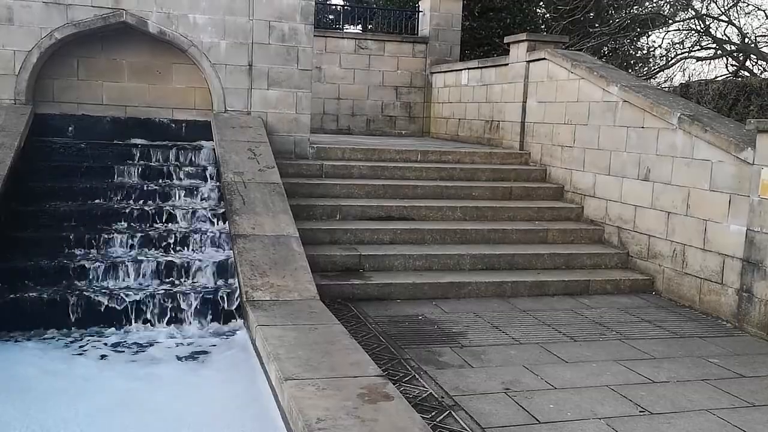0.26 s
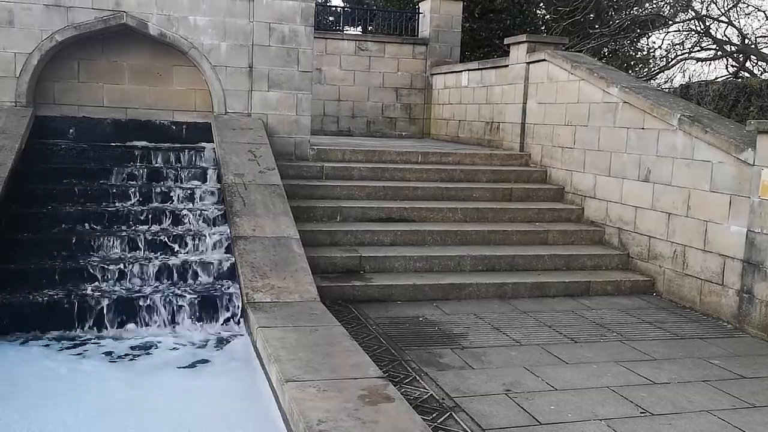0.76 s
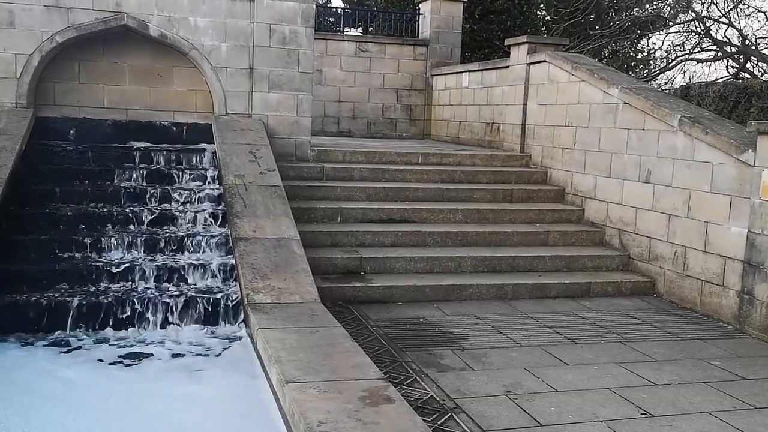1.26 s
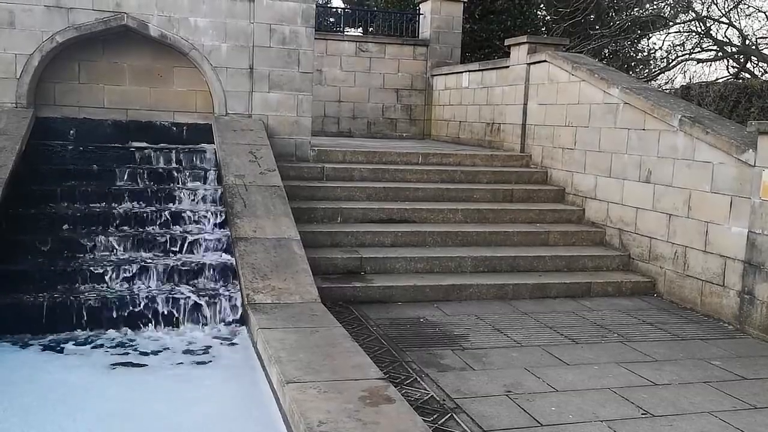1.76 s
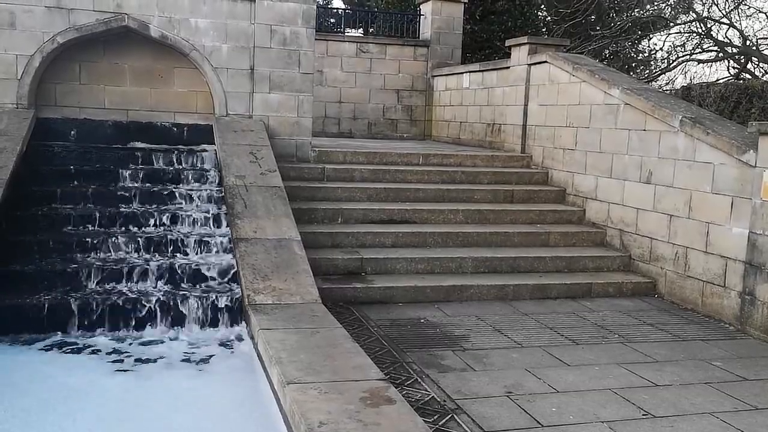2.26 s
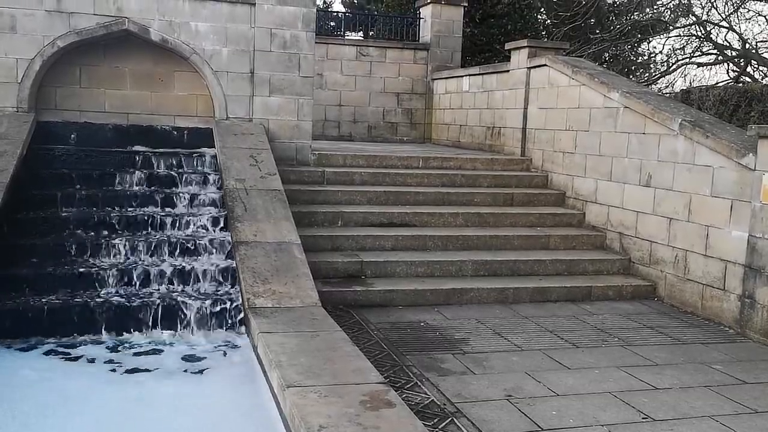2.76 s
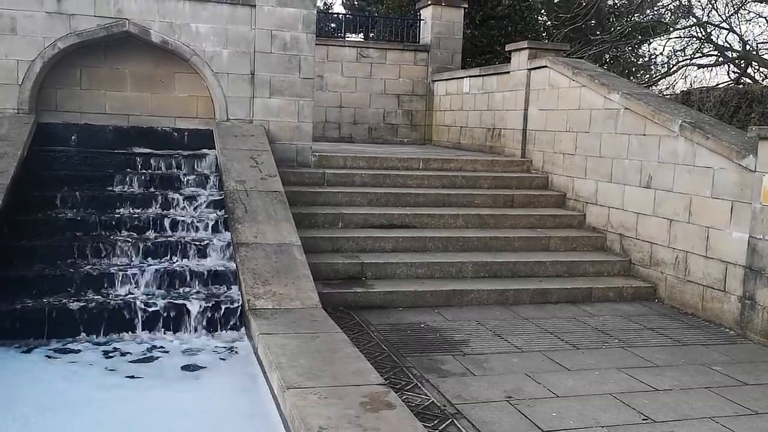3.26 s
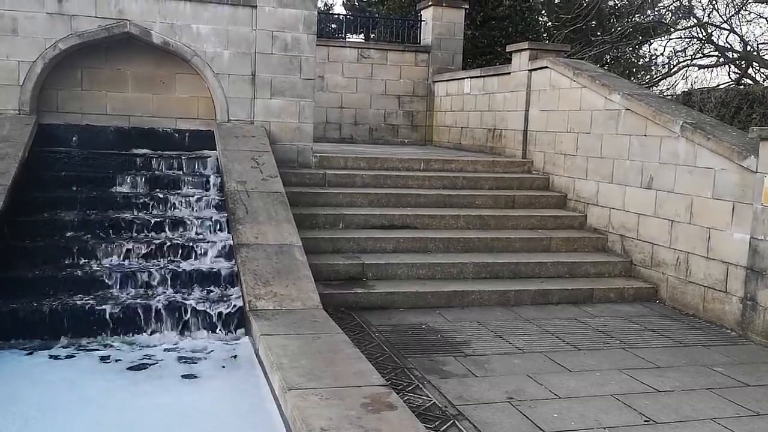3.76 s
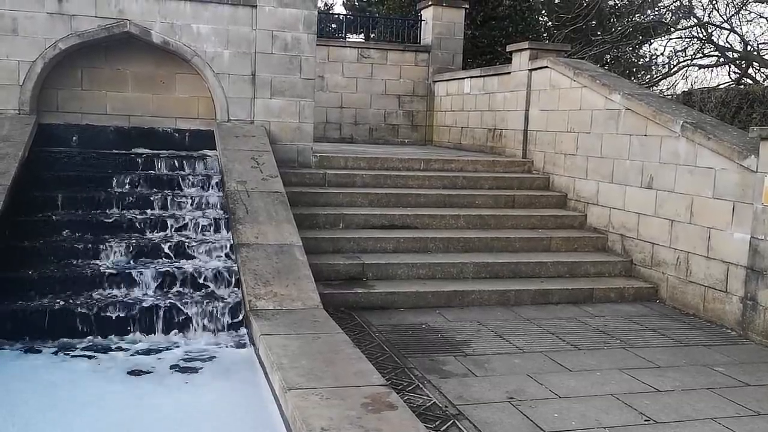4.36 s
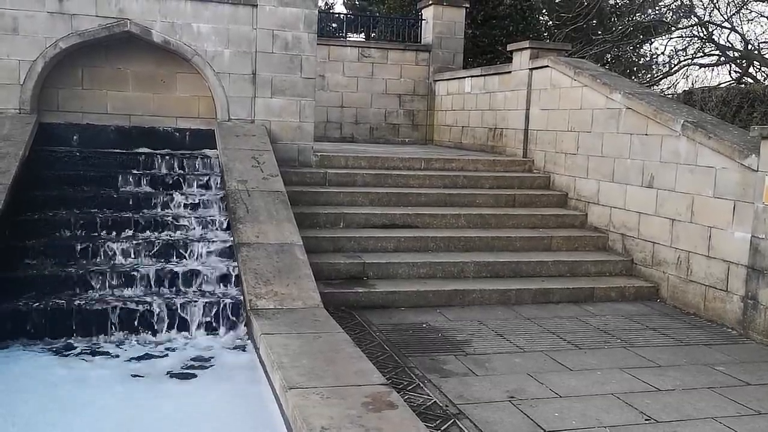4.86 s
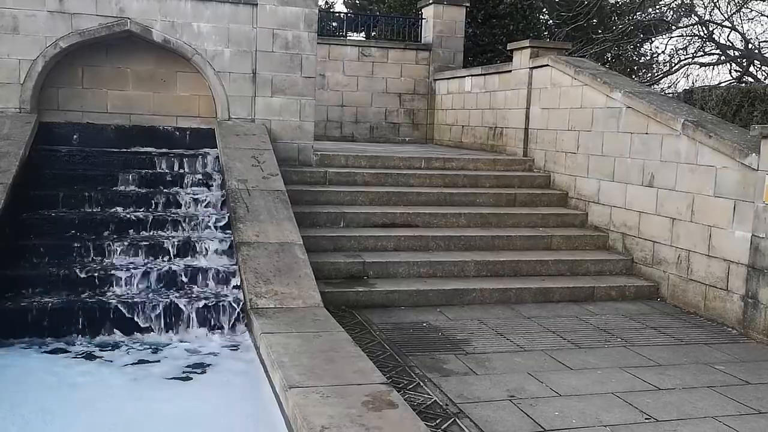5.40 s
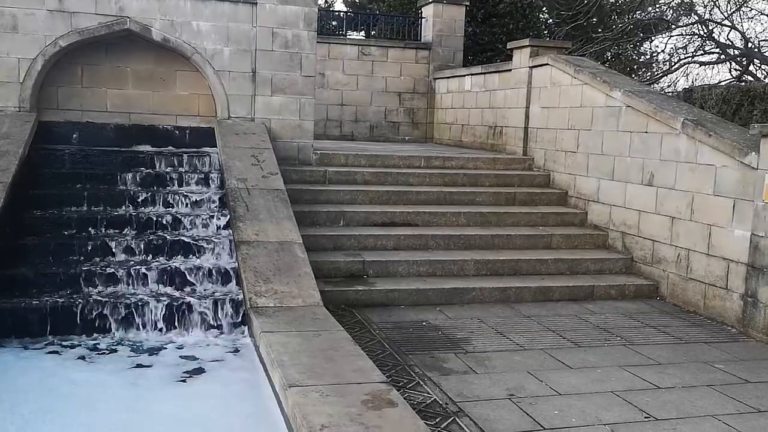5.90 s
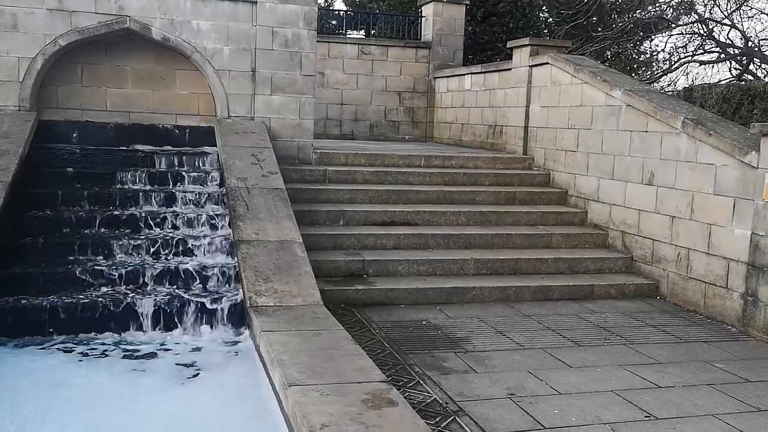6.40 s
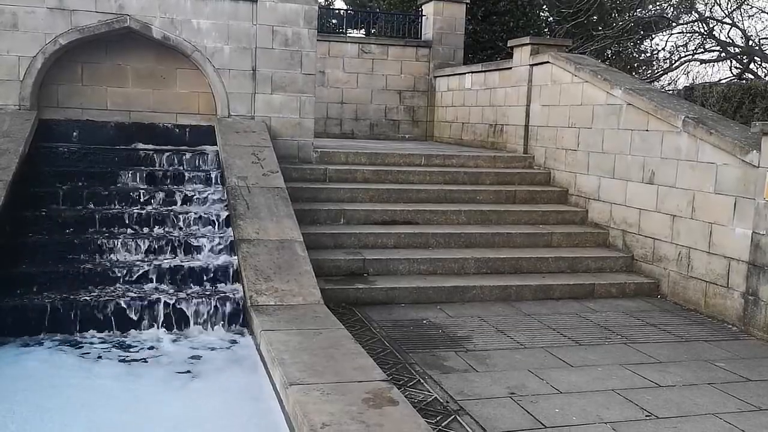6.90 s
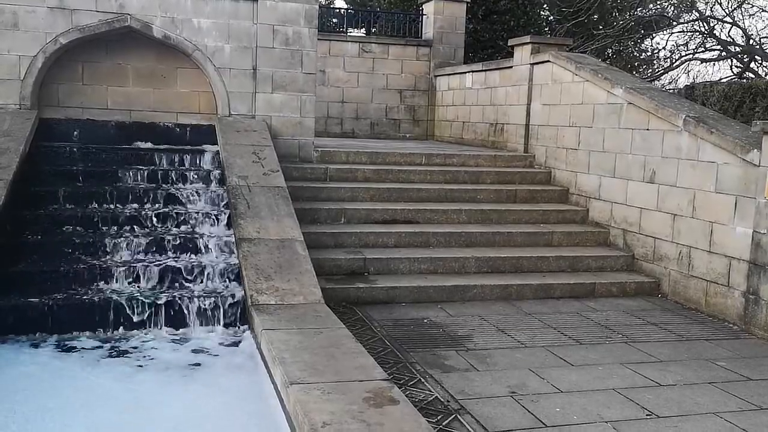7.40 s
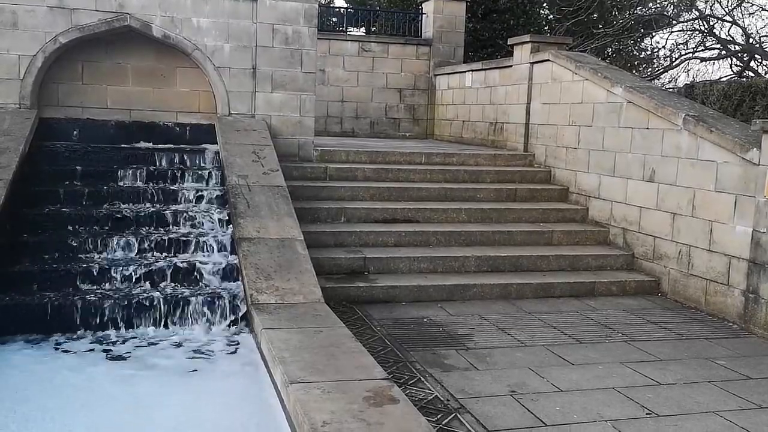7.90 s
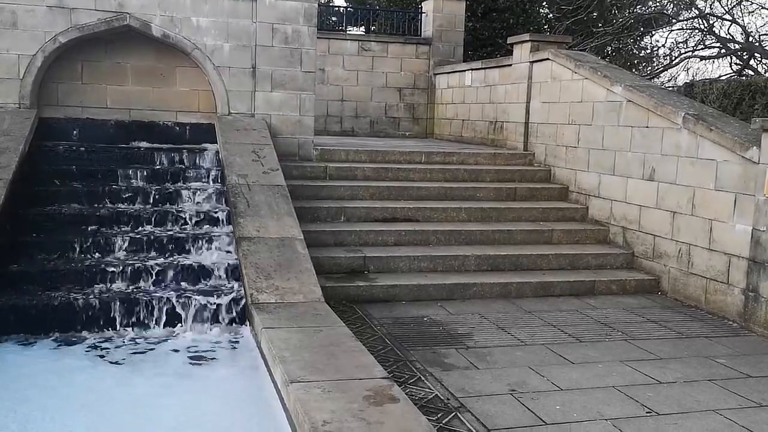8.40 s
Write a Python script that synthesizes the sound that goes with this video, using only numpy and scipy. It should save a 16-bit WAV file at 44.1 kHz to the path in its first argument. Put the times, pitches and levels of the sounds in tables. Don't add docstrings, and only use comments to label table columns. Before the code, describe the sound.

Thin water splashes steadily down stone steps into a foamy pool, over low distant traffic rumble and three dull, far-off machine thuds.

```python
import sys
import numpy as np
from scipy import signal
from scipy.fft import rfft, irfft
from scipy.io import wavfile
from scipy.ndimage import uniform_filter1d

SR = 44100
rng = np.random.default_rng(int(sys.argv[2]) if len(sys.argv) > 2 else 0)


def boost(x):
    u = np.asarray(x, float) / 20
    return 10 ** u


def store_wav(level_fs):
    pcm = np.round(np.clip(np.atleast_2d(level_fs), -1, 1) * 32767)
    wavfile.write(sys.argv[1], SR, pcm.T.astype(np.int16))


N = 381465

# pitch_hz, density_db (per Hz)
ROAD_ROAR = [(41, -15), (70, -3.5), (135, -8), (161, -8.5), (194, -8), (242, -9), (295, -18), (500, -25.5),
             (650, -46.5), (1100, -120)]
EDGES_HZ = 200 * 2 ** (np.arange(14) / 2)


def rms_one(x):
    return x / np.sqrt(np.mean(x ** 2) + 1e-20)


def in_time(rows):
    s, *columns = np.transpose(rows)
    return [np.interp(np.arange(N) / SR, s, c) for c in columns]


def at_hz(points):
    hz, value = np.transpose(points)
    bins_hz = np.arange(N // 2 + 1) * SR / N
    return np.interp(np.log(bins_hz + 1), np.log(hz), value)


def coloured(spectrum):
    white = rfft(rng.standard_normal(N))
    return rms_one(irfft(white * boost(at_hz(spectrum)), N))


def drift(rate):
    r = np.exp(-80 * np.pi * rate / SR)
    kicks = rng.standard_normal(N // 40 + 2002)
    slow = signal.lfilter([1], [1, -2 * r, r * r], kicks)[2000:]
    return np.interp(np.arange(N) / 40, np.arange(len(slow)), rms_one(slow))


def ring(clicks, hz, t60):
    r = boost(-60 / (t60 * SR))
    w = 2 * np.pi * hz / SR
    return signal.lfilter([0, np.sin(w)], [1, -2 * r * np.cos(w), r * r], clicks + 1e-18)


def grains(per_s, spread_db):
    sizes = boost(spread_db * np.minimum(rng.exponential(1, N), 3.5)) * rng.choice([-1, 1], N)
    return sizes * (rng.random(N) < per_s / SR)


def splash(surge_db, gains, flicker):
    bubble_cycles = 26
    white = rng.standard_normal((2, N))
    bubbles = grains(1100 * boost(2.5 * surge_db), spread_db=3.5)
    dealt = rng.integers(0, 26, N)
    crackle = rms_one(grains(5000 * boost(2.5 * surge_db), spread_db=3.0))
    out = boost(-18) * crackle
    for k, (low, high) in enumerate(zip(EDGES_HZ, EDGES_HZ[1:])):
        band = signal.butter(2, [low, high], "band", fs=SR, output="sos")
        sheet = signal.sosfilt(band, white[k % 2])
        pops = np.zeros(N)
        for j, hz in enumerate(low * np.array([1.09, 1.3])):
            pops = pops + ring(bubbles * (dealt == 2 * k + j), hz, bubble_cycles / hz)
        pops_db = -6.5 - 2.8 * (low > 4000)
        out = out + gains[k] * (rms_one(sheet) * flicker[k] + boost(pops_db) * rms_one(pops))
    return out


def water():
    # start_s, level_db
    flow = [(0, -39.5), (1.0, -39), (2.0, -39), (3.0, -39), (3.75, -39), (3.87, -39), (4.0, -39),
            (4.6, -38.5), (5.3, -39), (6.5, -39), (7.2, -39), (8.0, -39), (8.65, -39)]
    # pitch_hz, density_db (per Hz)
    left_port = [(300, -6), (600, -8), (990, -2.5), (1420, -7.5), (1850, 2), (2200, -4), (2500, 2.5),
                 (2970, -7.5), (3660, -4), (4400, -6), (5730, -14), (7540, -15), (9500, -24), (13000, -29)]
    right_port = [(300, -6), (645, -10.5), (1350, -3), (1720, 2), (2280, 1.1), (2670, 7), (4050, -15.5),
                  (6590, -18.5), (7800, -22.5), (8480, -67), (9040, -20.5), (9500, -24.5), (10470, -31),
                  (13000, -30.5)]
    # pitch_hz, alike_share (0-1)
    likeness = [(301, 0.01), (904, 0.55), (1162, 0.44), (1593, 0.16), (2282, 0.44), (2540, 0.71),
                (4134, 0.29), (4995, 0.52), (6201, 0.53), (10938, 0.12), (11670, 0), (12962, 1)]
    # pitch_hz, lead_rad
    lead = [(301, 0.45), (775, 2.18), (1335, 0.93), (1593, 2.8), (2153, 7.7), (3143, 11.34), (4521, 11.93),
            (5598, 13.3), (6115, 15.8), (6287, 21.2), (6632, 22.5), (8484, 26.75)]
    level_db, = in_time(flow)
    spray_db = 1.0 * drift(13)
    surge_db = .3 * drift(5) + 0.63 * drift(14) + 0.49 * drift(45)
    lows = EDGES_HZ[:-1, None]
    spray_share = np.clip(np.log2(lows / 2000), 0, 1) * 0.35
    bandwidth_gain = np.sqrt(0.69 * lows / SR)
    gains = bandwidth_gain * boost(spray_share * (spray_db - spray_db.mean()))
    patches_db = np.array([0.83 * drift(7.4) + 1.22 * drift(35) for band in lows])
    surge_share = np.clip(np.log2(lows / 900) / 3.8, .15, .9)
    flicker = boost(surge_share * surge_db + patches_db)
    shared, left, right = (rfft(splash(surge_db, gains, flicker)) for part in range(3))

    alike = np.clip(at_hz(likeness), 0, 1)
    hz, radians = np.transpose(lead)
    late = np.exp(-1j * np.interp(np.arange(len(alike)) * SR / N, hz, radians))
    left = boost(at_hz(left_port)) * (np.sqrt(alike) * shared + np.sqrt(1 - alike) * left)
    right = boost(at_hz(right_port)) * (np.sqrt(alike) * shared * late + np.sqrt(1 - alike) * right)
    high_pass = signal.butter(2, 280, "high", fs=SR, output="sos")
    ports = signal.sosfilt(high_pass, irfft([left, right], N))
    return boost(level_db + 4.0) * rms_one(ports)


def town():
    # start_s, level_db
    traffic = [(0.0, -40), (0.86, -39), (2.67, -43), (4.41, -40.5), (4.65, -42), (6.58, -38), (6.72, -35),
               (7.23, -40), (7.93, -38), (8.65, -39.5)]
    # pitch_hz, density_db (per Hz)
    deep_rumble = [(8.8, -60), (15, -2.5), (48, 1), (90, -5.5), (120, -36), (200, -120)]
    # middle_s, lift_db
    bumps = [(0.0, 10.5), (.19, 14), (.36, 8.5), (.51, 10.5), (.67, 4.5), (1.03, 8.5), (1.18, 1), (1.42, 4),
             (2.43, 10.5), (2.77, 3), (3.64, 7.5), (3.9, 12), (4.19, 8.5), (4.96, 11), (5.19, 3), (6.09, 2),
             (6.36, -1), (6.67, -3.5), (8.17, 15), (8.6, 9)]
    # start_s, pitch_hz, level_db (rms)
    engines = [
        [(6.75, 112.5, -59), (6.88, 111.5, -43), (7.3, 112.7, -46), (7.72, 115, -42), (7.82, 112.6, -50)],
        [(2.8, 64, -54), (3.1, 63.37, -42.5), (4.3, 66.94, -42), (5.9, 68.5, -59), (6.8, 67.8, -40),
         (7.5, 67, -56)],
    ]
    bump_s = 0.032
    heavy_db, = in_time(traffic)
    t = np.arange(N) / SR
    bumps_db = sum(lift_db * np.exp(-((t - s) / bump_s) ** 2) for s, lift_db in bumps)
    deep_db = heavy_db + 1.5 + bumps_db
    roar_db = -41 + 0.21 * (heavy_db - heavy_db.mean())
    roar_db = roar_db + 0.36 * drift(2.7) + .5 * drift(9)
    out = boost(deep_db) * coloured(deep_rumble) + boost(roar_db) * coloured(ROAD_ROAR)
    for engine in engines:
        hz, db = in_time(engine)
        phase = 2 * np.pi * np.cumsum(hz) / SR
        out += np.sqrt(2) * boost(db + 0.88 * drift(6.2)) * np.sin(phase)
    return out


def drops():
    # start_s, peak_db, pitch_hz, left_over_right_db
    plops = [(.0605, -27, 1930, 15), (.2, -29, 1950, 11), (.256, -24, 2800, -13), (.9215, -22, 3100, -1),
             (1.168, -22, 3630, 5), (1.268, -21, 3420, 5), (1.655, -30, 4550, 14), (1.9125, -24.5, 3300, 0),
             (2.059, -30, 5160, 8), (2.337, -24, 2780, -12), (2.666, -23, 2650, -11), (2.947, -25, 3550, 8),
             (3.292, -24, 2550, 14), (4.078, -31.5, 1150, 5), (4.1125, -26, 4000, 16),
             (4.114, -26, 4870, 13), (4.171, -23, 2580, -11), (4.491, -25, 1500, -6),
             (4.494, -29, 2000, -8), (5.403, -30, 1256, -5), (5.4255, -25, 3750, 7), (5.88, -19, 3180, 1.5),
             (5.8945, -26, 7300, 8.5), (6.438, -27, 1810, 12), (7.039, -21.5, 2440, -8),
             (7.396, -28.5, 1810, 12), (7.811, -28, 2720, 12), (8.019, -31, 1300, -2),
             (8.0664, -23, 3500, 10), (8.066, -28, 4500, 10)]
    pitch_rise = 0.005
    splatter_s = 0.0085
    out, t = np.zeros((2, N + 900)), np.arange(880) / SR
    ticks = rng.standard_normal((len(plops), 880)) * np.exp(-t / 0.00042)
    spray = rms_one(uniform_filter1d(rng.standard_normal((len(plops), 880)), size=24))
    for (s, db, hz, pan_db), tick, ragged in zip(plops, ticks, spray):
        cycles = 6.9 * (2000 / hz) ** .5
        turns = hz * t
        bubble = np.sin(2 * np.pi * turns * (.97 + pitch_rise * turns))
        bubble = bubble * np.exp(-turns / cycles) * (1 - np.exp(-turns * 1.2))
        splatter = ragged * np.sin(2 * np.pi * turns) * np.exp(-t / splatter_s) * (1 - np.exp(-turns))
        bubble = bubble + 0.8 * splatter * 1000 / hz
        plop = bubble + boost(-25) * tick * hz / 4000
        for side, lag in ((1, 0), (-1, 9)):
            i = round(s * SR) + lag
            out[(1 - side) // 2, i:i + 880] += boost(db - 1.0 + side * pan_db / 2) * plop
    return out[:, :N]


def thuds():
    # middle_s, peak_db, pitch_hz, length_s
    knocks = [(0.152, -31.5, 120, .073), (.8, -33, 146, 0.14), (1.041, -23.5, 86.5, 0.071),
              (1.065, -25, 212, .057), (1.097, -26, 163, .053), (1.198, -24, 75, 0.028),
              (2.416, -34, 54, .075), (4.2, -32, 69.5, 0.045), (4.961, -32, 46.3, 0.14),
              (5.645, -33.5, 152, 0.16), (5.96, -32, 203, 0.094), (6.25, -36.5, 197, .091),
              (6.72, -27.5, 175, 0.067), (6.85, -32.5, 183, .074), (8.14, -35, 141, 0.17),
              (0.077, -39, 100, 0.12), (1.341, -31.5, 95.7, 0.15), (4.501, -43.5, 255, 0.24),
              (4.45, -39.5, 200, 0.17), (5.948, -40.5, 267, 0.11), (5.05, -39, 115, 0.11)]
    # start_s, peak_db, tail_db (rms)
    blows = [
        (1.035, -24.5, -29.5),
        (3.815, -20, -29),
        (6.622, -20, -27),
    ]
    # after_s, level_db (against the blow), pitch_hz, length_s
    echoes = [
        (.006, 1.5, 144, .04),
        (0.013, -1.5, 210, .04),
        (.05, -8, 122, .045),
        (0.053, -9.5, 235, 0.036),
        (.079, -4, 100, .055),
        (.098, -11.5, 260.7, 0.038),
        (0.124, -2, 72, 0.025),
    ]
    t = np.arange(N) / SR
    out = np.zeros(N)
    pulses = [(s + lag, db + loss_db, hz, length)
              for s, db, tail_db in blows for lag, loss_db, hz, length in echoes]
    for s, db, hz, length in list(knocks) + pulses:
        near = slice(round((s - length / 2) * SR), round((s + length / 2) * SR))
        swell = np.cos(np.pi * (t[near] - s) / length) ** 2
        out[near] += boost(db) * swell * np.cos(2 * np.pi * hz * (t[near] - s))
    band = signal.butter(3, [65, 270], "band", fs=SR, output="sos")
    scatter = rms_one(signal.sosfilt(band, coloured(ROAD_ROAR)))
    tails = np.zeros(N)
    for s, peak_db, db in blows:
        decay = boost(db - 60 * np.clip(t - s, 0, 3) / .9)
        tails = tails + decay * np.clip((t - s) / .025, 0, 1)
    return out + tails * scatter


def scene():
    # pitch_hz, density_db (per Hz)
    apart = [(15, -1.5), (60, 3), (210, -3), (300, -8), (420, -30)]
    low = town() + thuds()
    unlike = boost(-55) * coloured(apart)
    lead = -4.5 * np.gradient(low)
    return water() + drops() + low + (unlike + lead) * [[1], [-1]]


def gain_control(x):
    limit_db, squeeze = -24, .35
    attack_s, recover_db_per_s = .008, 50
    climb_db = recover_db_per_s * np.arange(N) / SR
    power = uniform_filter1d(np.mean(x ** 2, axis=0), size=441)
    level_db = 10 * np.log10(power + 1e-12)
    held_db = np.maximum.accumulate(np.maximum(level_db - limit_db, 0) + climb_db) - climb_db
    r = np.exp(-1 / (attack_s * SR))
    return x * boost(-squeeze * signal.lfilter([1 - r], [1, -r], held_db))


def band_limit(x):
    return signal.sosfilt(signal.butter(12, 15010, fs=SR, output="sos"), x)


def record(dry):
    low_pass = signal.butter(3, 14300, fs=SR, output="sos")
    dull = signal.sosfilt(low_pass, gain_control(dry))
    return band_limit(dull)


dry = scene()
out = record(dry)
store_wav(out)
```